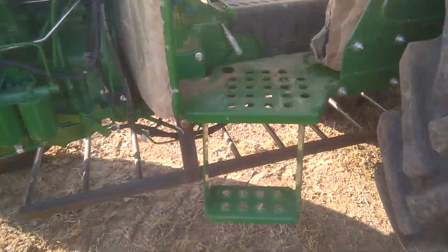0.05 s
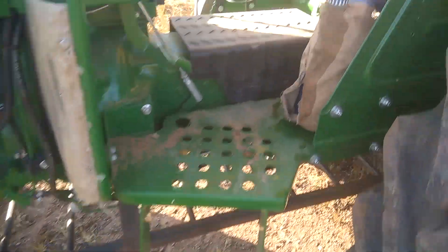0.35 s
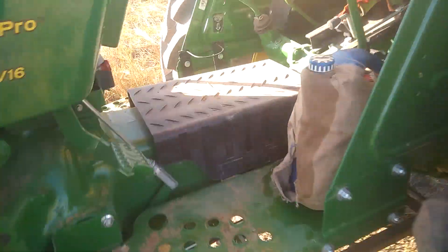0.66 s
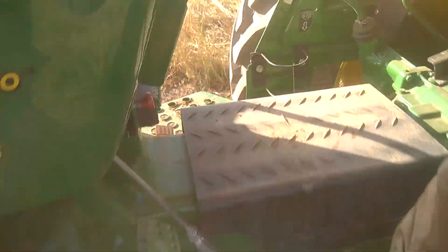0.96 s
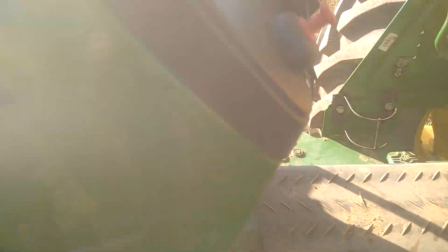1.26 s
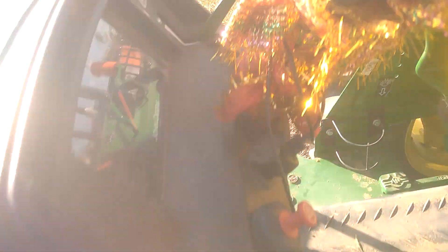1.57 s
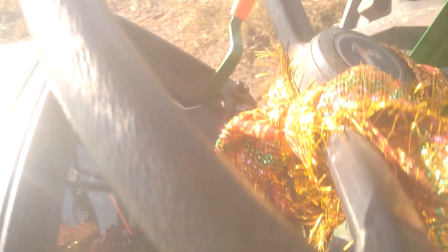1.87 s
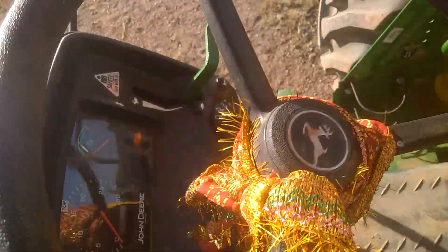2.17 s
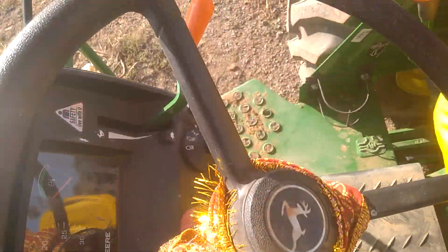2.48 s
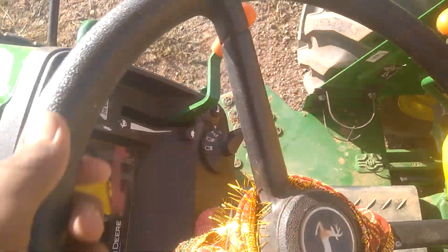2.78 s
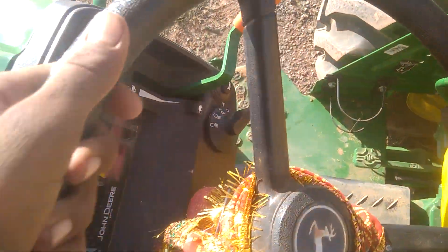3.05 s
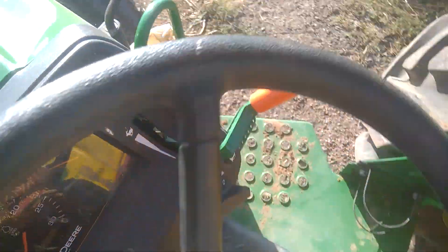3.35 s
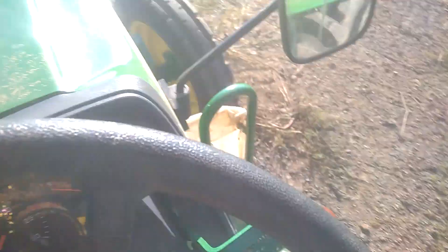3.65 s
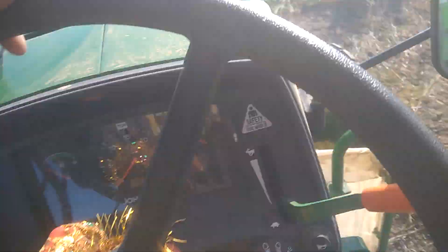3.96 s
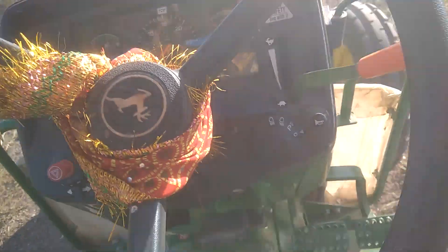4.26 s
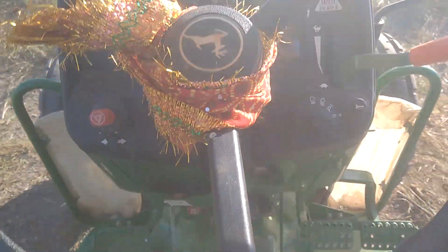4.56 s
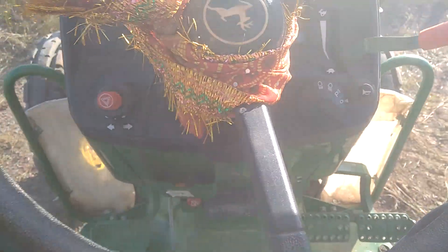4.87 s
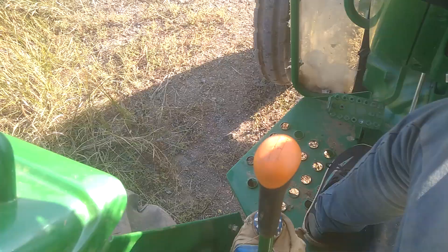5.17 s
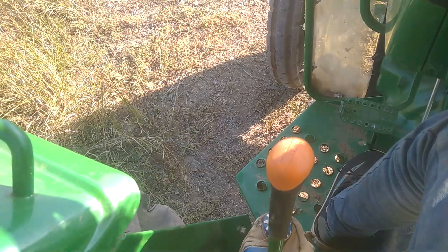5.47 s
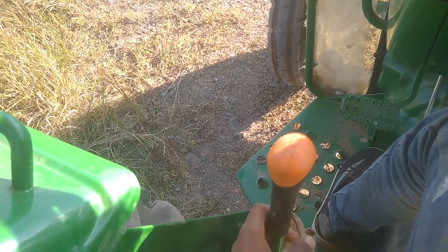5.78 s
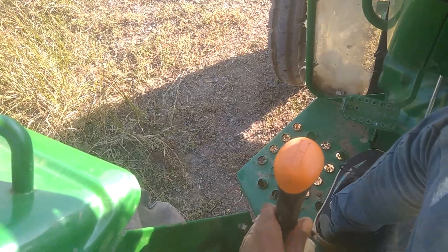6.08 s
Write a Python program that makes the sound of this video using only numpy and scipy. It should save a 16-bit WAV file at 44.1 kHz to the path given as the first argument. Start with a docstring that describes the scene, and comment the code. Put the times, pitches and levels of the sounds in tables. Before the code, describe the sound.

Outdoors, a faint faraway machine keeps up an even clinking beat while, close to a handheld phone, a person gets onto a parked tractor. Rustling cloth, a few sharp ticks and light knocks come first. Past the middle, seat rubbing and harder hollow knocks lead to one short shrill squeak and a ringing metal lever clack. Low finger thumps and grip rumble on the microphone fill the end, with no echo.

```python
"""Climbing onto a parked tractor

Someone climbs up in a field, phone in hand. The frame knocks under the weight, the seat cover sticks
and slips, a dry joint squeaks, a lever clacks and the bodywork rings on. Clothes rustle, sharp ticks
sound close by, fingers bump the phone. Far off, a machine beats and clinks about 3.5 times a second."""
import sys
import numpy as np
from scipy import signal
from scipy.fft import rfft, irfft, next_fast_len
from scipy.io import wavfile
from scipy.ndimage import map_coordinates

SR = 44100
rng = np.random.default_rng(int(sys.argv[2]) if len(sys.argv) > 2 else 0)


def generate_wav(sig):
    """Save sig (samples, or channels by samples) to the path in sys.argv[1] as 16-bit PCM at SR."""
    pcm = np.round(np.clip(np.atleast_2d(sig).T, -1, 1) * 32767).astype(np.int16)
    wavfile.write(sys.argv[1], SR, pcm)


N = 274666
TIME = np.arange(N) / SR


# boots and weight on the frame: t/s, level/dB, decay/s, treble/dB
FRAME_BLOWS = [(.858, -38, 0.039, -2), (.956, -43.5, .007, -6), (1.742, -49, .055, 4),
               (2.445, -46.5, .006, -5), (2.568, -49, 0.041, 7), (2.602, -41, 0.015, 0.5),
               (2.729, -47.5, .015, -4), (3.297, -33.5, .0045, -5), (3.321, -42, 0.015, -1),
               (4.086, -24.5, .016, 0), (4.206, -29.5, 0.015, -13), (4.234, -31.5, 0.014, 3),
               (5.892, -49, 0.037, -10)]
# blow spectrum: f/Hz, level/dB
BLOW_SPECTRUM = [(100, -10.5), (300, -6), (430, -5), (600, -3), (900, -6.5), (1300, -9.5), (2100, -13),
                 (2700, -13), (4200, -13.5), (5400, -23.5), (7100, -19.5), (9000, -33), (14000, -45.5)]
# hollow frame: f/Hz, width/Hz, level/dB
FRAME_MODES = [(319, 61, 0), (581, 63, -3.5), (786, 60, -6.5), (1231, 60, -7), (1510, 60, -3)]
# bodywork, also rung by squeak and lever: f/Hz, level/dB, t60/s
BODYWORK_MODES = [(278.4, -8.5, 0.52), (407, -16.5, .7), (502, -9, 0.72), (563, -7.5, 1.25),
                  (578, -8, 0.93), (630, -4, 0.3), (1254, -3.5, 0.24), (2300, -10, 0.26), (3103, -4, .1),
                  (3420, -13, 0.33), (3800, -13.5, .4), (4300, -13.5, 0.38), (4340, -18.5, 0.32),
                  (7410, -9.5, 0.16)]

def knocks(treble_hz=1500, rise_s=.004):
    """Dull, scuffing blows make the frame boom; the hardest rings the bodywork."""
    grit = colour(friction(slips_per_s=9000, spread_db=0, smooth=1.27, alike=.53), BLOW_SPECTRUM)
    dull = butterworth(grit, 1, treble_hz, "low")
    blows = sum(from_db(db) * burst(at_s, rise_s, decay_s) * (dull + from_db(treble_db) * (grit - dull))
                for at_s, db, decay_s, treble_db in FRAME_BLOWS) * pan(4)
    boom = sum(from_db(db) * resonate(blows, hz, width_hz) for hz, width_hz, db in FRAME_MODES)
    return from_db(-1.5) * blows + boom + from_db(-37.5) * ring(BODYWORK_MODES, at_s=4.087)


# seat rubs: t/s, level/dB, rise/s, decay/s
SEAT_STROKES = [(1.87, -59, .35, 0.13), (3.245, -49, 0.018, 0.021), (3.305, -44.5, .02, 0.04),
                (3.45, -59, .08, 0.1), (3.685, -43.5, 0.048, .1), (3.91, -48, .03, .04),
                (3.975, -37.5, 0.029, 0.076), (4.11, -36.5, 0.066, 0.027), (4.19, -42.5, 0.02, 0.038),
                (4.6, -52, .22, 0.086), (5.92, -53, 0.032, 0.054), (6.19, -55, 0.023, 0.027)]
# seat cover: f/Hz, level/dB
COVER_SPECTRUM = [(150, -17), (220, -23.5), (320, -7.5), (430, -9), (600, -8), (880, -15), (1250, -13.5),
                  (2000, -16), (3000, -19.5), (4500, -24), (5100, -33.5), (6800, -27), (9000, -36.5),
                  (14000, -48.5)]

def seat(groan_hz=410, judder_db=2):
    """The seat cover sticks and slips; the hollow pan beneath it groans."""
    slips = friction(slips_per_s=1500, spread_db=3, smooth=.82, alike=.68)
    cover = from_db(-1.1) * colour(slips, COVER_SPECTRUM)
    groan = from_db(-4) * narrow_band(slips.mean(axis=0), groan_hz, width_hz=130)
    level = strokes(SEAT_STROKES) * from_db(judder_db * drift(70))
    return level * (cover + groan) * pan(5)


# squeak partials: harmonic number, level/dB, L-R/dB
SQUEAK_HARMONICS = [(1, -1, 11), (2, -22.5, -8.5), (3, -23, 8.5), (4, -36, 16), (5, -40, 4.5),
                    (6, -45, -3.5)]
# metal joint: f/Hz, level/dB, t60/s
JOINT_MODES = [(2132, -2, .4), (2208, -5, .2), (2670, -7, .12), (4336, -14, .15), (4490, -8, 0.41),
               (4590, -1, .14), (4670, -3, .17), (6686, -14, .36), (6900, -17, .36), (8900, -30.5, .25)]

def squeak(lock_s=4.287, note_hz=2224, rival_hz=2660, glide_hz_per_s=6000, jitter_hz=90, shimmer_db=3):
    """A dry joint rasps on two competing modes, locks into one shrill note and rings on."""
    rasping = from_db(-17) * burst(4.276, rise_s=.012, decay_s=.005)
    locked = from_db(-7.5) * held(lock_s, end_s=4.303, rise_s=.0045, decay_s=.012)
    level = rasping + locked
    roughness = (.7 * rasping + .13 * locked) / level
    pitch_hz = np.maximum(note_hz - glide_hz_per_s * np.maximum(lock_s - TIME, 0), note_hz / 2)
    phase = 2 * np.pi * np.cumsum(pitch_hz + jitter_hz * roughness * drift(600)) / SR
    note = np.zeros((2, N))
    for harmonic, db, balance_db in SQUEAK_HARMONICS:
        flicker_db = shimmer_db * (harmonic > 1) * drift(250)
        smear_rad = .3 * (harmonic - 1) * drift(450)
        note += from_db(db + flicker_db) * np.sin(harmonic * phase + smear_rad) * pan(balance_db)
    rival = from_db(-10) * np.sin(2 * np.pi * rival_hz * TIME + .6 * drift(300)) * pan(5)
    scrape = from_db(-5) * hiss([(400, -14), (1500, -10), (2500, 5.5), (3400, -10.5), (4400, -2),
                                 (5500, -14), (7000, -7.5), (10000, -29), (14000, -26)], alike=.46)
    joint = from_db(-34) * ring(JOINT_MODES, at_s=4.305)
    bodywork = from_db(-42.5) * ring(BODYWORK_MODES, at_s=4.3)
    return level * (note + roughness * (rival + scrape)) + (joint + bodywork) * pan(5.5)


# lever clack: f/Hz, level/dB
CLACK_SPECTRUM = [(88, -52.5), (150, -20), (366, -22), (588, 1), (945, -11), (1310, -10.5), (2100, -18.5),
                  (2310, -14.5), (4000, -5), (5220, -23), (6550, -10.5), (8390, -23), (11400, -28),
                  (12300, -25), (14000, -78.5)]
# lever resonances: f/Hz, width/Hz, level/dB
LEVER_MODES = [(578, 33, -3), (2480, 41, -6), (3470, 89, -3), (3880, 40, -2.5), (4200, 110, -5),
               (6040, 36, -10), (6400, 46, -10), (7380, 40, 0.5), (8380, 47, -20), (9400, 90, -29),
               (10200, 29, -25), (11000, 33, -25)]

def lever(at_s=4.586, mode_gain_db=10):
    """A lever chatters briefly against its stop; the bodywork rings and rattles on."""
    chatter = colour(friction(slips_per_s=7000, spread_db=1.5, smooth=.97, alike=.27), CLACK_SPECTRUM)
    impact = from_db(-21.5) * burst(at_s, rise_s=.0037, decay_s=.011)
    tail = from_db(-48) * burst(at_s, rise_s=.0035, decay_s=.047)
    blow = chatter * (impact + tail)
    metal = sum(from_db(db + mode_gain_db) * resonate(blow, hz, width_hz)
                for hz, width_hz, db in LEVER_MODES)
    rattle = hiss([(180, -10), (260, -1), (340, -7), (420, -6), (570, .5), (760, -8), (1400, -17),
                   (5000, -48)], alike=.42)
    rattle *= from_db(-45.5) * burst(at_s, rise_s=.003, decay_s=.13)
    bodywork = from_db(-38) * ring(BODYWORK_MODES, at_s)
    return (from_db(-.5) * blow + metal + rattle + bodywork) * pan(.5)


# cloth on cloth: t/s, level/dB, rise/s, decay/s
CLOTH_RUBS = [(.01, -55, .03, .07), (.205, -38.8, .038, 0.019), (.57, -50.5, 0.27, 0.12),
              (.96, -49, .06, .11), (1.63, -49, 0.033, .032), (1.76, -54, 0.034, .04),
              (1.95, -48.5, 0.033, .045), (2.9, -55, .1, 0.086), (3.32, -51.5, 0.14, 0.053),
              (3.52, -57.5, 0.032, .045), (3.675, -46.5, 0.046, 0.14), (3.99, -47, 0.093, 0.35)]
# cloth rustle: f/Hz, level/dB
CLOTH_SPECTRUM = [(300, -35), (1500, -10), (3000, -2.5), (4200, 0.5), (5200, -4.5), (7000, 0.5),
                  (9000, -13), (12500, -15.5), (15000, -28.5)]
# cloth treble shelf: t/s, level/dB
CLOTH_TREBLE = [(0, 0.5), (.7, 3.5), (1.9, 0), (3.2, -4), (4.4, -4), (6.23, 3)]
# sleeve rub: f/Hz, level/dB
SLEEVE_SPECTRUM = [(400, -18), (1400, -11.5), (2200, 2.5), (3400, -6), (4700, -14), (6000, -2.5),
                   (7300, -1.5), (8700, -12.5), (10000, -38), (12500, -18.5), (15000, -40)]

def clothes(rest_db=-67.3, flutter_db=1.1, treble_hz=10000):
    """Cloth slides on cloth over a faint steady rustle; a sleeve drags once along the wheel."""
    cloth_slips = friction(slips_per_s=2500, spread_db=3, smooth=.73, alike=.053)
    cloth = treble_shelf(colour(cloth_slips, CLOTH_SPECTRUM), treble_hz, CLOTH_TREBLE) * pan(5.5)
    sleeve_slips = friction(slips_per_s=6000, spread_db=1, smooth=1.7, alike=.096)
    sleeve = colour(sleeve_slips, SLEEVE_SPECTRUM) * pan(16.5)
    cloth_level = np.hypot(from_db(rest_db), strokes(CLOTH_RUBS))
    sleeve_level = from_db(-51) * held(2.38, end_s=2.627, rise_s=.12, decay_s=.055)
    return from_db(flutter_db * drift(35)) * (cloth_level * cloth + sleeve_level * sleeve)


# ticks, mostly close by; those at 1.461 s and 3.744 s are far clinks: t/s, level/dB, f/Hz, t60/s, L-R/dB
TICKS_AND_CLINKS = [(0.9407, -12.2, 2300, 0.0012, 27), (.9429, -25.5, 1650, .0018, 18),
                    (1.242, -25.5, 2300, 0.0087, 10), (1.461, -38, 3900, .0066, 4),
                    (3.1096, -23, 3000, .0044, 12.5), (3.699, -30.5, 3000, .0013, 5),
                    (3.744, -34, 2780, .032, 10)]

def ticks(low_cut_hz=450, top_ratio=2.2, snap_band_hz=(3500, 8000)):
    """Each tick is a contact snap and a few damped cycles, too small to carry bass."""
    out, t = np.zeros((2, N)), TIME[:SR // 20]
    snap = butterworth(from_db(-1.5) * (t == 0), 2, snap_band_hz, "band")
    for at_s, db, hz, t60_s, balance_db in TICKS_AND_CLINKS:
        tone = from_db(-60 * t / t60_s) * np.sin(2 * np.pi * hz * t)
        tone = butterworth(tone, 2, [low_cut_hz, top_ratio * hz], "band")
        tick = tone / np.abs(tone).max() + snap
        start = int(at_s * SR)
        out[:, start:start + len(t)] += from_db(db) * tick * pan(balance_db)
    return out


# grip rumble, growing as the hand tightens: t/s, level/dB
GRIP_LEVEL = [(0, -69), (.75, -76), (.95, -66), (1.4, -69.5), (2.5, -61), (3.95, -63), (4.25, -52.5),
              (4.9, -61), (5.2, -58), (6.23, -54)]
# grip rumble: f/Hz, level/dB
GRIP_SPECTRUM = [(20, -28), (45, -16.5), (75, -1.5), (110, 1), (170, -7.5), (260, -8.5), (400, -17.5),
                 (700, -32), (2000, -50)]
# finger shifts: t/s, level/dB, f/Hz, L-R/dB, thump count
FINGER_BUMPS = [(.858, -45, 126.6, 13, 3), (1.845, -48, 100, -8, 2), (2.091, -37.5, 157.4, -31, 1),
                (4.068, -37, 92, 17, 1), (4.228, -31.5, 264, 17, 1), (4.42, -36, 158, 29, 1),
                (4.52, -37, 175, -24, 1), (4.646, -39.5, 261, 5, 1), (4.692, -41, 170, 2, 2),
                (4.814, -44, 211, -26, 1), (4.972, -45.5, 119.3, 27.5, 1), (5.207, -40.5, 196, 25, 3),
                (5.364, -35, 96, 30, 1), (5.588, -37, 116, 15, 1), (5.697, -30, 110, 37, 1),
                (5.956, -35.5, 160, 30, 2), (6.158, -36.5, 103, 28, 3)]

def handling(lumps_db=2.5, rise_cycles=.81, gap_s=.026, loss_db=2):
    """The grip on the phone rumbles; each finger shift gives one to three low thumps."""
    grip_level = from_db(curve(GRIP_LEVEL) + lumps_db * drift(22))
    out = grip_level * hiss(GRIP_SPECTRUM, alike=.25) * pan(12)
    for at_s, db, hz, balance_db, count in FINGER_BUMPS:
        for k in range(round(count)):
            start = min(int((at_s + k * gap_s) * SR), N)
            cycles = hz * TIME[:min(SR // 10, N - start)]
            swell = (cycles / rise_cycles * np.exp(1 - cycles / rise_cycles)) ** 2
            thump = from_db(db - k * loss_db) * swell * np.sin(2 * np.pi * cycles)
            out[:, start:start + len(cycles)] += thump * pan(balance_db)
    return out


# even runs of beats: first t/s, period/s, count
MACHINE_RUNS = [(.0615, .2834, 19), (5.354, .2817, 4)]
# beat: f/Hz, level/dB
BEAT_SPECTRUM = [(500, -12.5), (800, -9), (1030, 1.5), (1450, -6.5), (2000, -6.5), (2650, -3), (3400, -6),
                 (4400, -9.5), (5200, -15.5), (6500, -16), (8500, -45), (14000, -38)]
# beat treble shelf, falling as the rider climbs in: t/s, level/dB
BEAT_SHELF = [(0, 12), (.95, 12), (1.2, 4.5), (1.7, -0.5), (2.6, -1), (3.46, 5.5), (3.8, -3), (6.23, -7)]
# whirr: t/s, level/dB
WHIRR_ENVELOPE = [(0, -64.5), (2.2, -66), (4.7, -63), (5.1, -64.5), (5.3, -60), (6.23, -60.5)]
# whirr: f/Hz, level/dB
WHIRR_SPECTRUM = [(200, -15.5), (260, -4.5), (400, -8.5), (820, -8.5), (980, 5), (1150, -5.5), (1800, -13),
                  (2400, -13.5), (2620, -4), (2900, -16), (3300, -6), (3700, -16), (7000, -29.5),
                  (14000, -49.5)]
# left microphone's delay as the phone turns: t/s, lag/s
LEFT_LAG = [(0, .00044), (1.9, .00048), (2.3, 0.0013), (3.6, 0.00086), (4.6, -.00022), (6.23, -.00022)]

def far_machine(beat_db=-43.1, treble_hz=3000):
    """Each turn gives one rattling beat, blurred by distance, and a round of clinks over a whirr."""
    beats_s = np.concatenate([first_s + period_s * np.arange(count)
                              for first_s, period_s, count in MACHINE_RUNS])
    rattle = treble_shelf(hiss(BEAT_SPECTRUM, alike=.52), treble_hz, BEAT_SHELF)
    beat_level = from_db(beat_db) * sum(burst(at_s, rise_s=.0094, decay_s=.011) for at_s in beats_s)
    whirr = from_db(curve(WHIRR_ENVELOPE)) * hiss(WHIRR_SPECTRUM, alike=.4)
    left, right = whirr + beat_level * rattle + clinks(beats_s)
    lagged_left = map_coordinates(left, [(TIME - curve(LEFT_LAG)) * SR], order=3)
    return np.array([lagged_left, right])


# clinks of one turn: t/s from the beat, f/Hz, width/Hz, level/dB, decay/s
CLINK_ROUND = [(-.07, 2420, 300, -54.5, .007), (-.062, 1120, 180, -52.5, .008),
               (-.062, 1620, 300, -55.5, .008), (-.016, 4500, 600, -54.5, 0.0048),
               (0, 1050, 140, -47.5, .011), (0, 2600, 110, -49.5, .018), (.008, 3274, 80, -52.5, 0.014),
               (.02, 111, 60, -57.5, 0.012), (.092, 3200, 90, -52, .02), (.092, 3490, 200, -52.5, .015),
               (.102, 2820, 90, -53.5, .018), (.149, 2608, 280, -51.5, 0.0075)]
# how well the clinks carry: t/s, level/dB
CLINK_ENVELOPE = [(0, -1), (.8, 4.5), (2.1, 0.5), (3.0, -8.5), (3.5, 0.5), (5.25, -5.5), (5.62, -3),
                  (6.23, 0.5)]

def clinks(beats_s, uneven_db=1.4):
    """The far machine's metal parts ring in the same order each turn, unevenly loud."""
    out = np.zeros((2, N))
    white = pair(rng.standard_normal((2, N)), alike=.494)
    for offset_s, hz, width_hz, db, decay_s in CLINK_ROUND:
        strikes = np.zeros(N)
        for at_s, chance in zip(beats_s + offset_s, rng.standard_normal(len(beats_s))):
            if 0 < at_s < TIME[-1]:
                strikes[int(at_s * SR)] = from_db(db + uneven_db * chance)
        shape = burst(.022, rise_s=.0042, decay_s=decay_s)[:SR // 5]
        level = signal.oaconvolve(strikes, shape)[shape.argmax():][:N]
        out += level * narrow_band(white, hz, width_hz)
    return from_db(curve(CLINK_ENVELOPE)) * out


# open air: t/s, level/dB
AIR_ENVELOPE = [(0, -53), (.8, -56.5), (2.2, -56), (3.05, -59), (3.6, -54.5), (4.8, -61), (6.23, -65)]
# open air: f/Hz, level/dB
AIR_SPECTRUM = [(100, -13), (200, -14.5), (350, -7), (550, -6), (750, -6), (1000, -7.5), (1400, -7),
                (2500, -0.5), (3400, -7), (4400, -10), (5200, -19.5), (7200, -16.5), (9400, -30.5),
                (12000, -23), (14600, -35.5)]
# body shifts: t/s, level/dB, rise/s, decay/s
BODY_SWISHES = [(.58, -55.5, 0.12, .1), (1.0, -52.5, 0.083, .1), (4.12, -47.5, .19, 0.13),
                (4.38, -53.5, .1, 0.16), (5.14, -52, 0.22, 0.074)]

def field(flutter_db=.5):
    """Open country hisses faintly; the shifting body adds dull swishes of the same colour."""
    level = np.hypot(from_db(curve(AIR_ENVELOPE)), strokes(BODY_SWISHES))
    return level * from_db(flutter_db * drift(13)) * hiss(AIR_SPECTRUM, alike=.19) * pan(5)


def from_db(db):
    """Decibels to gain."""
    return 10 ** (np.asarray(db) / 20)


def rms_one(x):
    """Scale to rms 1."""
    return x / np.sqrt(np.mean(x ** 2) + 1e-20)


def curve(rows):
    """Interpolate (t/s, value) rows at every sample."""
    return np.interp(TIME, *np.transpose(rows))


def drift(rate_hz):
    """Slow random wander, rms 1."""
    knots = rng.standard_normal(size=8192)
    return rms_one(np.interp(TIME * rate_hz, np.arange(len(knots)), knots))


def held(start_s, end_s, rise_s, decay_s):
    """Gaussian rise to start_s, hold to end_s, exponential fall."""
    rise = (np.maximum(start_s - TIME, 0) / rise_s) ** 2
    fall = np.maximum(TIME - end_s, 0) / decay_s
    return np.exp(-np.minimum(rise + fall, 40))


def burst(at_s, rise_s, decay_s):
    """A swell that peaks at at_s and falls at once."""
    return held(at_s, at_s, rise_s, decay_s)


def strokes(rows):
    """Envelope of overlapping rubs; their powers add."""
    return np.sqrt(sum((from_db(db) * burst(at_s, rise_s, decay_s)) ** 2
                       for at_s, db, rise_s, decay_s in rows))


def pan(balance_db):
    """Left and right gains with mean 1, left above right by balance_db."""
    gains = from_db(np.array([[balance_db], [-balance_db]]) / 2)
    return gains / gains.mean()


def pair(x, alike):
    """Mix two unrelated signals to stereo with correlation `alike`."""
    return np.sqrt(1 + alike) * x[0] + np.sqrt(1 - alike) * x[1] * np.array([[1], [-1]])


def butterworth(x, order, hz, kind):
    """Causal Butterworth filter."""
    return signal.sosfilt(signal.butter(order, hz, kind, fs=SR, output="sos"), x)


def treble_shelf(x, corner_hz, gain_rows):
    """High shelf following (t/s, level/dB) rows."""
    return x + (from_db(curve(gain_rows)) - 1) * butterworth(x, 1, corner_hz, "high")


def colour(x, spectrum):
    """Shape a texture by (f/Hz, level/dB) rows; rms 1."""
    hz, db = np.transpose(spectrum)
    size = next_fast_len(N)
    bins_hz = np.maximum(np.arange(size // 2 + 1) * SR / size, 1)
    gain = from_db(np.interp(np.log(bins_hz), np.log(hz), db))
    gain *= np.minimum(bins_hz / hz[0], 1) ** 2
    return rms_one(irfft(rfft(x, size) * gain, size)[..., :N])


def hiss(spectrum, alike):
    """Smooth stereo noise shaped by (f/Hz, level/dB) rows."""
    return colour(pair(rng.standard_normal((2, N)), alike), spectrum)


def friction(slips_per_s, spread_db, smooth, alike):
    """Tiny slips of uneven size over smooth sliding noise."""
    sizes = from_db(spread_db * np.minimum(rng.exponential(1, (2, N)), 4))
    signs = rng.choice([-1, 1], (2, N))
    slips = rms_one(sizes * signs * (rng.random((2, N)) < slips_per_s / SR))
    return pair(slips + smooth * rng.standard_normal((2, N)), alike)


def resonate(x, hz, width_hz):
    """Two-pole resonance, peak gain 1."""
    radius = np.exp(-np.pi * width_hz / SR)
    feedback = [1, -2 * radius * np.cos(2 * np.pi * hz / SR), radius ** 2]
    return signal.lfilter(np.array([1, 0, -1]) * (1 - radius ** 2) / 2, feedback, x)


def narrow_band(x, hz, width_hz):
    """Two equal resonances in series; rms 1."""
    return rms_one(resonate(resonate(x, hz, width_hz), hz, width_hz))


def ring(modes, at_s):
    """Modes struck together, each with its own phase at each microphone."""
    out, start = np.zeros((2, N)), int(at_s * SR)
    t = TIME[:N - start]
    for hz, db, t60_s in modes:
        phase_rad = 2 * rng.random((2, 1))
        out[:, start:] += from_db(db - 60 * t / t60_s) * np.sin(2 * np.pi * hz * t + phase_rad)
    return out


def close_mics(x, mono_below_hz=750):
    """Long waves reach both microphones nearly alike."""
    side = butterworth((x[0] - x[1]) / 2, 1, mono_below_hz, "high")
    return x.mean(axis=0) + side * np.array([[1], [-1]])


def scene():
    """All sources in the open, without reverberation."""
    background = field() + far_machine()
    climbing = clothes() + seat() + knocks() + close_mics(lever() + squeak())
    return background + climbing + ticks() + handling()


def record(dry, low_cut_hz=45, high_cut_hz=14200):
    """The phone thins the deep bass and cuts the top."""
    thin = butterworth(dry, 2, low_cut_hz, "high")
    return signal.sosfilt(signal.ellip(10, .1, 80, high_cut_hz, fs=SR, output="sos"), thin)


dry = scene()
out = record(dry)
generate_wav(out)
```